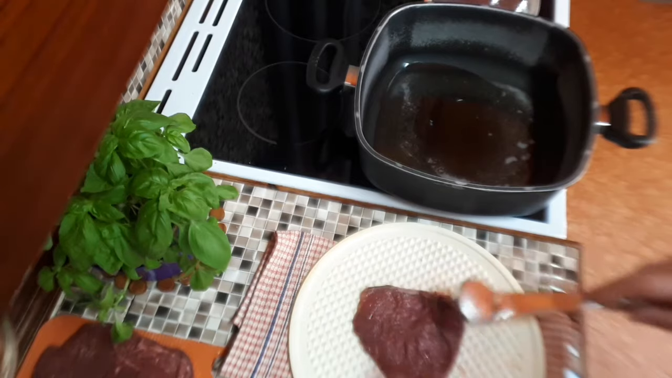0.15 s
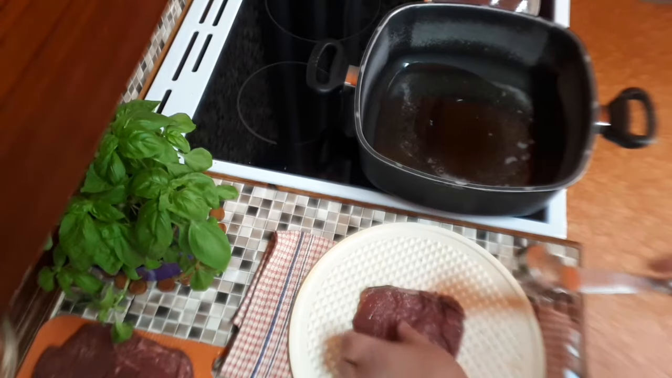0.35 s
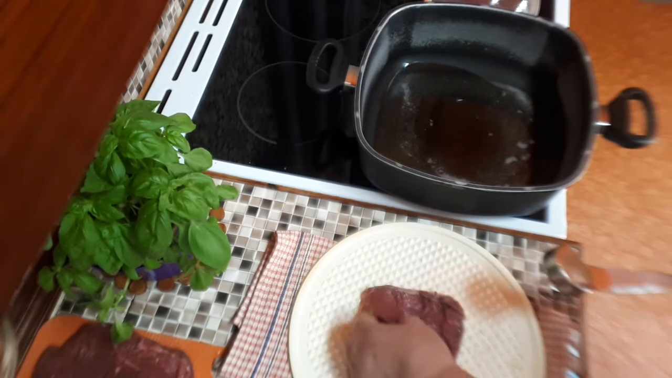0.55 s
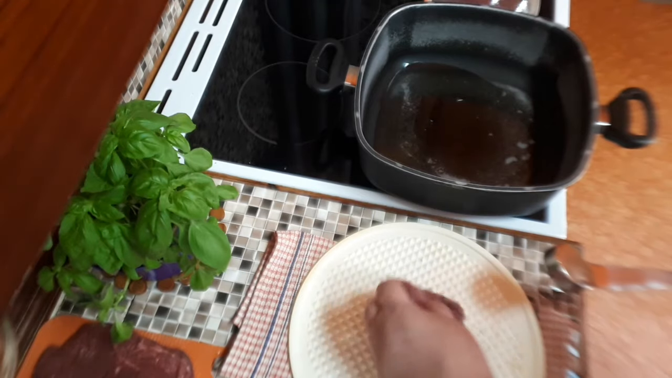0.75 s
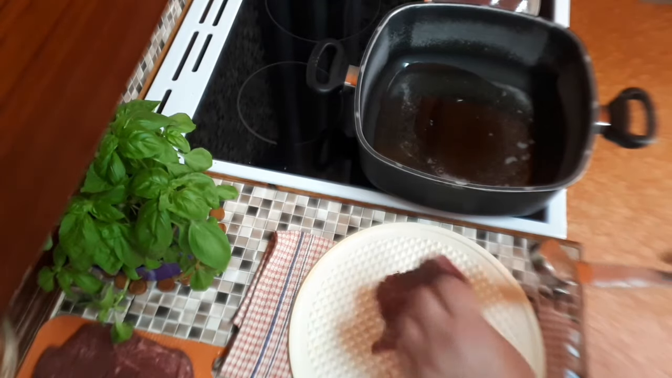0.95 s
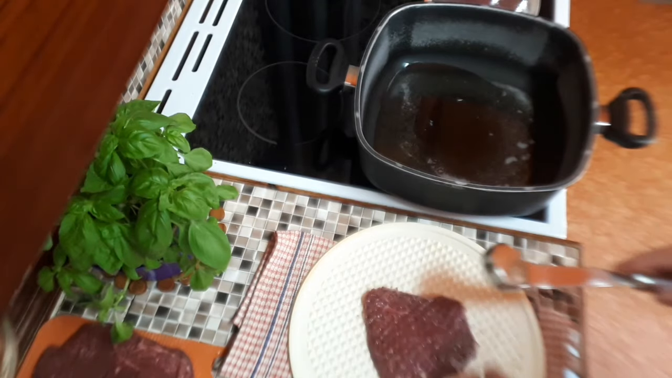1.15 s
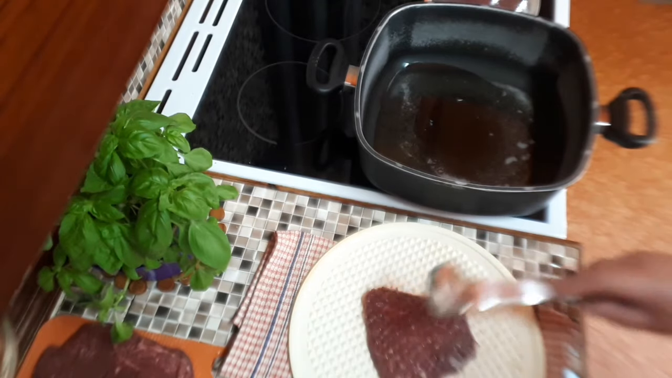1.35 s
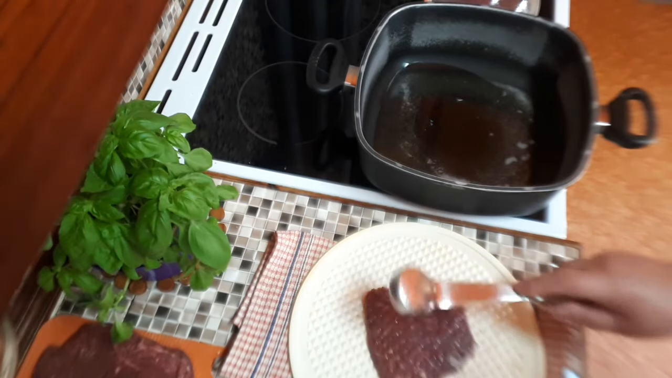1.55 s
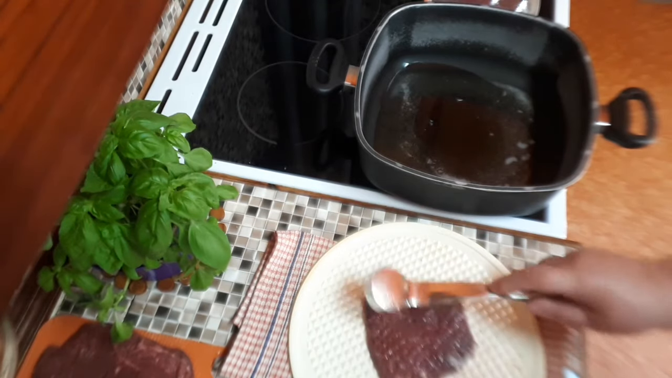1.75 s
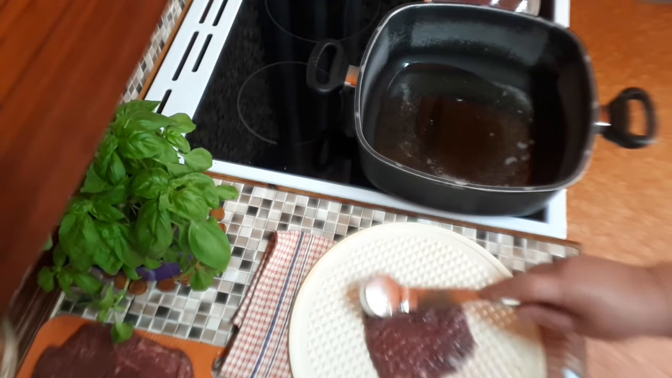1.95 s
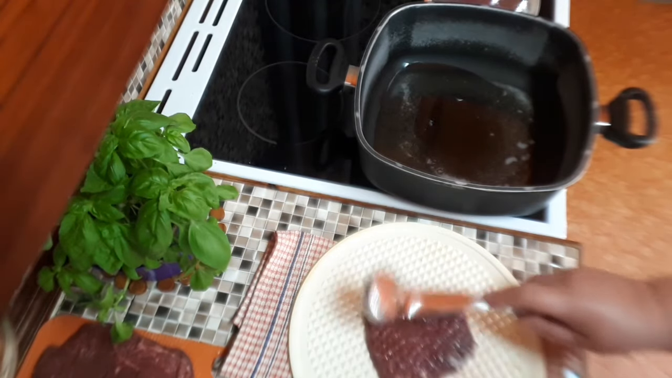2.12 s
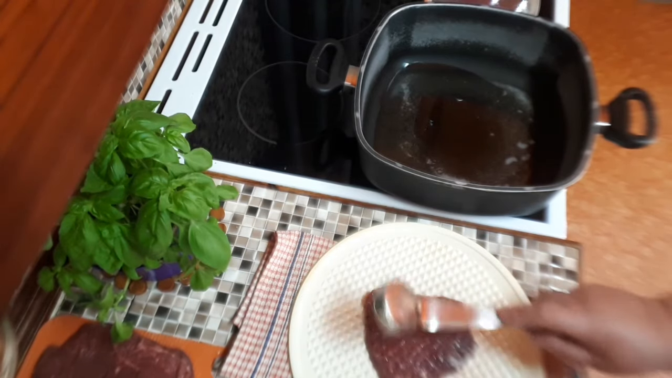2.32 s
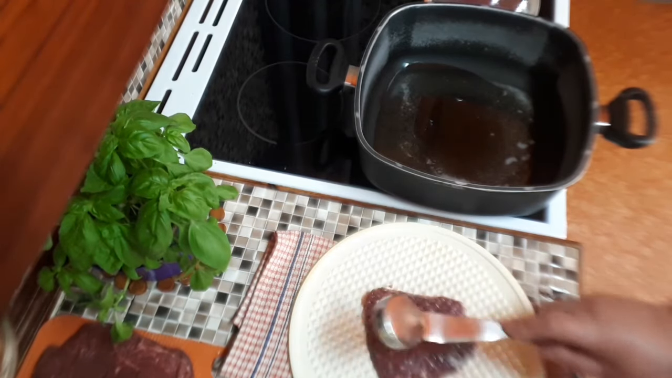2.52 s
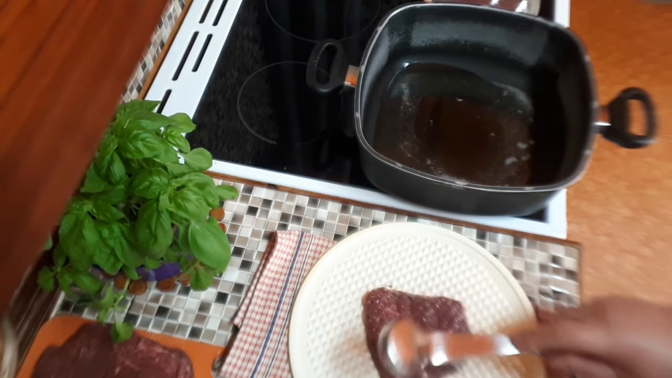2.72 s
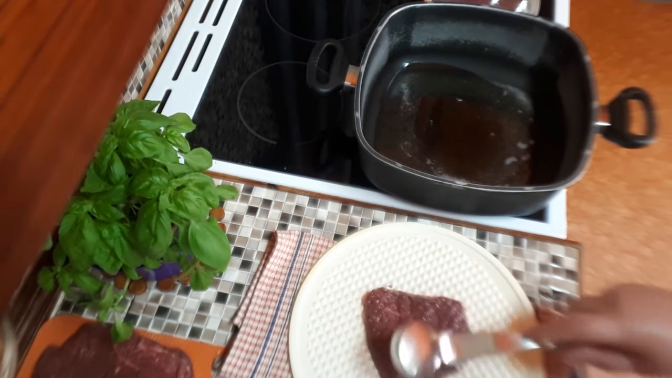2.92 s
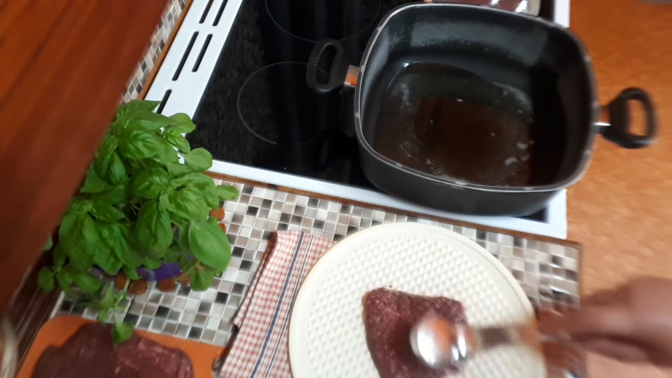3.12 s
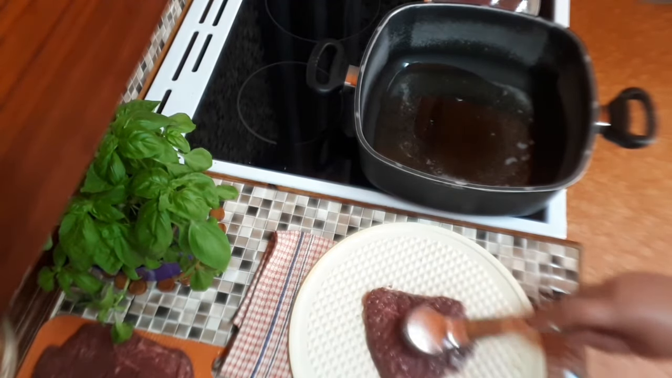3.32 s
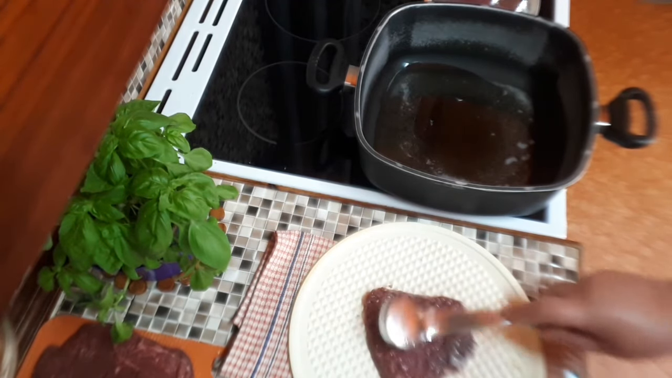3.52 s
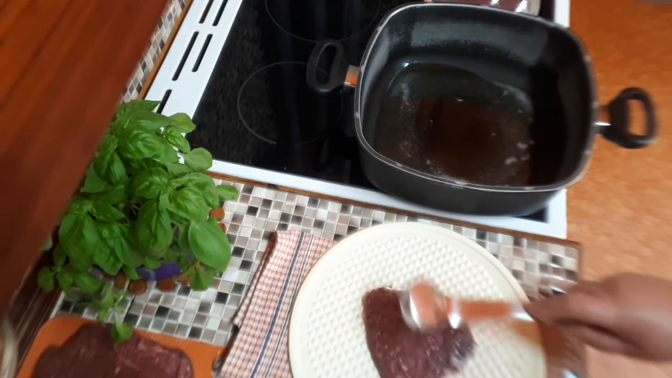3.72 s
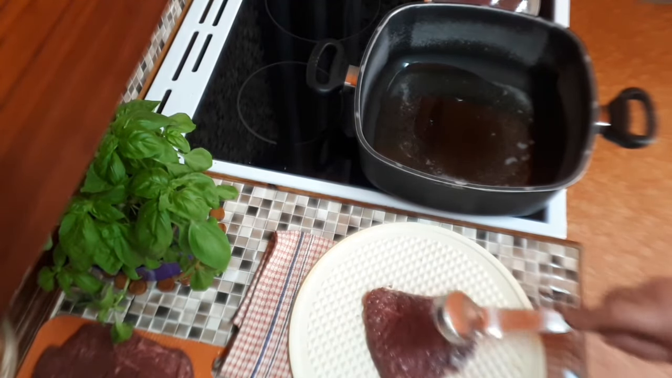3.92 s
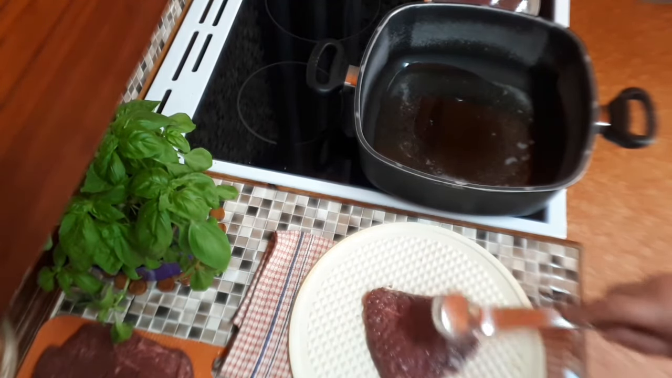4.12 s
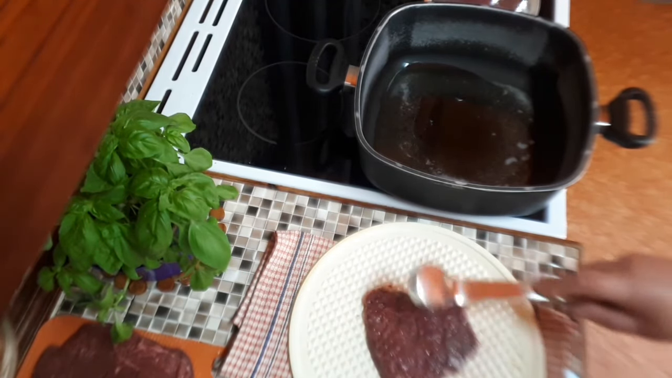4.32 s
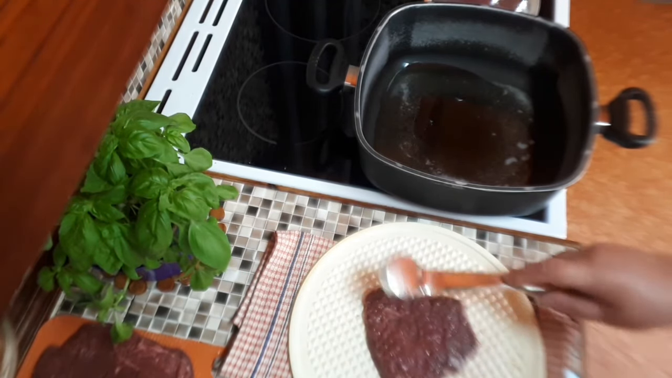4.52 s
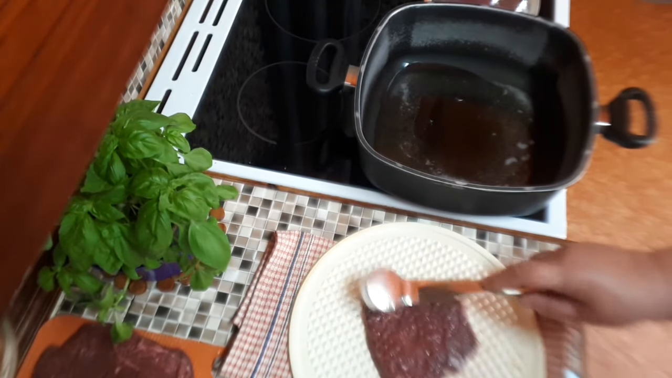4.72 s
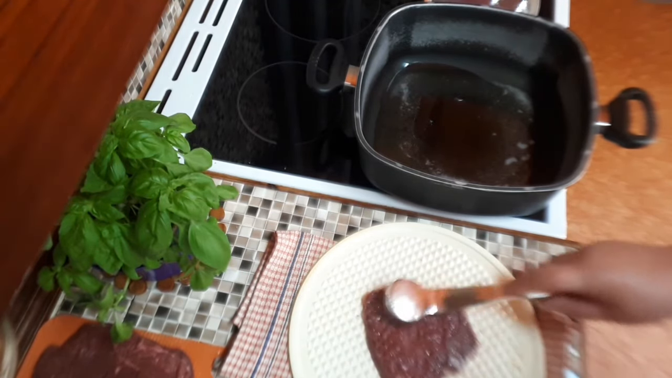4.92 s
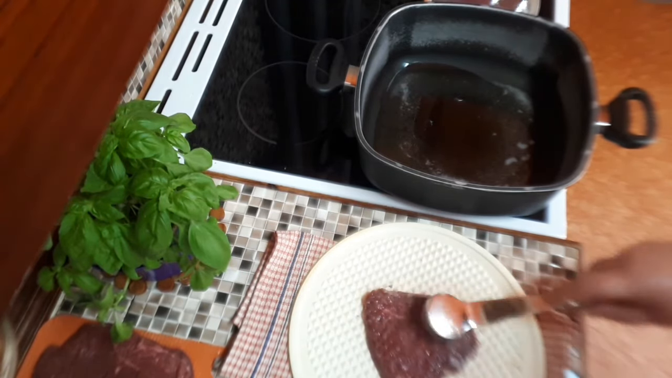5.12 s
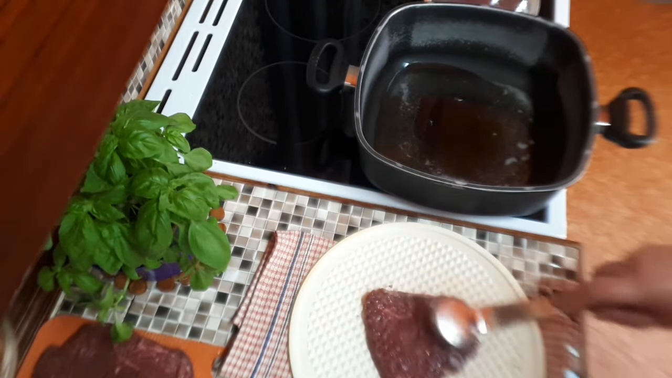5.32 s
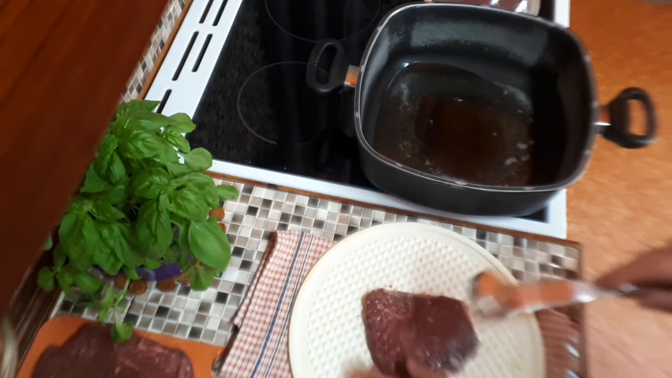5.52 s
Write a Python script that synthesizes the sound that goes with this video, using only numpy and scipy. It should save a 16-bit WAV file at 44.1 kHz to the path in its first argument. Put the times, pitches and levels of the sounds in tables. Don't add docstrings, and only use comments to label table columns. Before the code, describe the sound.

A small hard-surfaced kitchen, heard closely in stereo over quiet air and soft microphone hiss. The fading tail of an earlier blow is barely present when, at 0.05 s, a steel spoon clacks hard against a plastic board with a thump. From about 0.45 to 1.05 s fingers slide and turn a raw meat slice: very faint sticky catches and rubbing. At 1.08 s the slice drops with a soft wet flop. From 1.44 s to 5.35 s the spoon pounds it evenly, about every 0.23 s. Each blow is a low counter thud with a dull fleshy squash and a light wet slap, followed some 30 to 40 ms later by a crisp sticky tick as steel peels away, sometimes doubled. Weights and tones vary slightly. At 4.01 s one blow strikes the board, louder, harder and knockier. Low resonances and a short bright room tail trail each hit; the last fades by the end, about 5.7 s.

```python
import sys
import numpy as np
from scipy import signal
from scipy.fft import rfft, irfft, next_fast_len
from scipy.io import wavfile
from scipy.ndimage import map_coordinates

SR = 44100
rng = np.random.default_rng(int(sys.argv[2]) if len(sys.argv) > 2 else 0)


def amplitude_ratio(level_db):
    exponent = np.asarray(level_db, float) / 20
    return 10 ** exponent


def dump_mix(stems):
    frames = np.atleast_2d(stems).T
    limited = np.clip(frames, -1, 1)
    pcm = np.round(limited * 32767).astype(np.int16)
    wavfile.write(sys.argv[1], SR, pcm)


N = 245371
LEAD = SR // 2
SPAN = int(.47 * SR)

# frequency in Hz, level in dB per Hz.
HUSH_SPECTRUM = [(15, -36), (25, -5.5), (145, 1), (677, -18.5), (1020, -4.5), (1440, -16), (2610, -18),
                 (4140, -28.5), (5730, -19.5), (6210, -25.5), (6740, -24), (14000, -19), (16000, -22)]
# frequency in Hz, t60 in seconds.
KITCHEN_T60 = [(200, 0.35), (600, 0.49), (2000, 0.5), (5000, 0.41), (9000, 0.38), (15000, 0.28)]
# frequency in Hz, likeness from 0 to 1.
PORT_LIKENESS = [(150, 0.8), (300, 0.8), (600, 0.8), (1300, 0), (4000, 0)]
# frequency in Hz, level in dB.
WALL_COLOUR = [(150, -0.5), (350, -5), (700, 0), (4000, -0.5), (12000, -2)]
# frequency in Hz, level in dB.
PORT_COLOUR = [(20, -1), (45, 0.5), (70, 4), (2500, 5.5), (3600, 11.5), (5500, -1.5), (7600, 2),
               (9000, -11.5), (11600, -2), (13500, -7), (15800, -4.5), (16050, -15.5), (16700, -32)]
# frequency in Hz, left minus right in dB.
PORT_BALANCE = [(60, -1.5), (150, -1.5), (380, -2), (950, 2.6), (2600, -0.5), (4000, -7), (15000, -3.5)]
# time in seconds, level in dB.
FINGER_PRESSURE = [(0.5, -99), (0.606, -60), (0.7, -76), (0.8, -79.5), (0.93, -82.5), (0.98, -80),
                   (1.065, -60.5)]
# start in seconds, peak in dB.
CATCHES = [(0.457, -92.5), (0.551, -59), (0.595, -60.5), (0.707, -61), (0.799, -64), (0.814, -63),
           (0.936, -64), (0.997, -66.5), (1.041, -58), (1.357, -70)]
# frequency in Hz, width in Hz, level in dB.
SLIDE_RESONANCES = [(176.5, 32, -2), (1070, 100, -8), (1280, 89, -2.5), (2200, 150, -8.5),
                    (3400, 79, -12.5), (4640, 430, -18.5), (6550, 1300, -22.5)]
# start in seconds, peak in dB, spoon ring in dB.
PEELS = [(0.067, -46, -11), (1.4812, -25, -10), (1.7206, -27, -12.5), (1.73, -36, 5.5), (1.7492, -42, -7),
         (1.9618, -23.5, -15), (2.2092, -25, -24), (2.4722, -33.5, -1), (2.4945, -34.5, -6),
         (2.673, -31, -14), (2.725, -34, -6), (2.7454, -39.5, 2.5), (2.898, -24.5, -3.5),
         (2.9456, -36, -16), (3.1284, -25, -5), (3.3497, -24, -7), (3.587, -27.5, -4), (3.8153, -23, -6),
         (4.045, -24, -23), (4.484, -21.5, -10), (4.4922, -27.5, -5), (4.708, -21.5, -13),
         (4.7172, -27.5, -19), (4.913, -33, -12), (4.9344, -21.5, -9), (4.945, -27, -20), (5.135, -34, -7),
         (5.156, -22, -6.5), (5.3637, -30, -2), (5.3847, -27, -29)]
# frequency in Hz, level in dB.
TICK_SPECTRUM = [(3500, -16), (6000, -7.5), (8000, 5.5), (12000, 7), (17000, 0)]
# frequency in Hz, level in dB.
SPOON_RING = [(1500, -41), (3000, -12), (3600, -1), (4200, -26), (6000, -24), (9000, -51)]
# start in seconds, peak, low part, bright part and room, all in dB.
KNOCKS = [
    (0.047, -8, 1.5, -2.5, -3.5),
    (1.0774, -22.5, -3.5, -1.5, -2),
    (4.014, -4.5, 11, 1, -2.5),
]
# frequency in Hz, width in Hz, level in dB.
BOARD_RESONANCES = [(257, 75, 0), (363, 50, 4.5), (750, 520, -5), (546, 150, -3.5), (962, 61, -8.5),
                    (1296, 550, -3.5), (1664, 180, -3), (2070, 223, -6), (2770, 940, -17)]
# start in seconds, peak in dB, pitch of the squeezed air pocket in Hz,
# its strength in dB.
SLAPS = [(0.0475, -30.5, 3940, 6.5), (1.0777, -26, 2520, 2.5), (1.4413, -32, 3560, -4),
         (1.6987, -30.5, 7200, 14), (1.927, -29.5, 3260, 1.5), (2.172, -26, 3220, 0.5),
         (2.4008, -29.5, 7500, -1), (2.6334, -34, 7700, 6), (2.8579, -28, 2820, -3),
         (3.0949, -32.5, 6370, -11), (3.3158, -29.5, 6500, 1), (3.5564, -35.5, 7700, 8),
         (3.7813, -28.5, 7600, -9), (4.0104, -25.5, 2580, 4), (4.2337, -32, 7700, -7),
         (4.451, -41, 3440, -6), (4.6754, -31.5, 2660, 0), (4.9025, -36.5, 7400, -1),
         (5.122, -32.5, 6940, 8), (5.3547, -32, 7700, -22)]
# frequency in Hz, level in dB.
SLAP_SPECTRUM = [(1200, -34), (3000, -26.5), (5000, 0.5), (8000, 1.5), (12000, 5.5), (17000, -2.5)]
# start in seconds, upper thump peak in dB, deep thump in dB, flesh in dB,
# pitch at which the squashed spot answers in Hz.
BLOWS = [(0.049, -17.5, -29.5, -22.5, 1000), (1.078, -41.5, -42.5, -27.5, 1000),
         (1.4405, -22.5, -22, -44, 1000), (1.6978, -19.5, -22.5, -35, 700), (1.928, -17, -20, -33.5, 975),
         (2.1729, -16.5, -18.5, -31, 1080), (2.4023, -16.5, -18.5, -30.5, 2150),
         (2.6343, -15.5, -17.5, -31.5, 1600), (2.858, -15, -18, -29, 1040),
         (3.0965, -21, -21.5, -35.5, 1500), (3.316, -18.5, -20, -35, 2200), (3.5567, -23, -21, -42, 2300),
         (3.7825, -14.5, -20.5, -30.5, 1600), (4.013, -13, -23, -22, 1000), (4.2348, -20.5, -25, -43, 650),
         (4.4505, -15, -20.5, -36, 565), (4.675, -15.5, -18.5, -32.5, 620),
         (4.9026, -17, -19.5, -36.5, 900), (5.1232, -13, -20.5, -33, 620), (5.354, -16.5, -22, -42.5, 1400)]
EARLIER_BLOW = (-0.3237, -3.5, -9, -7.5, 998)
# frequency in Hz, left in dB, right in dB, t60 in seconds,
# lead of the right port in radians.
LOW_MODES = [(41, -19, -23, .3, .6), (59.2, -10.5, -14.5, 1, .3), (84.2, -1, 2.5, 0.38, 0.71),
             (108.83, -0.5, -3, 0.43, 0.18), (134.83, -11, -5.5, 0.66, 0.2), (151.8, -6, -9, 0.48, 1.95),
             (182.7, -7.5, -2, 0.14, 1.55), (207.4, -5.5, -6, 0.49, 4.1), (245.7, 3.5, 7, 0.19, 2.39),
             (297.6, -11.5, -8, 0.38, .1), (367.4, -7.5, -6, 0.28, .2), (434.7, -13.5, -16, 0.33, .3),
             (466.4, -19.5, -21, 0.55, 0.3)]
# frequency in Hz, level in dB.
CUPBOARDS = [(40, -20), (90, -2), (150, -5), (250, 2), (380, -5), (520, -17), (900, -38)]
# frequency in Hz, level in dB.
DULL_FLESH = [(200, -3.5), (450, 6), (700, 2.5), (1000, 0.5), (1500, -9), (3000, -62)]
# frequency in Hz, level in dB.
BRIGHT_FLESH = [(500, -23), (1100, -2.5), (1600, 0.5), (2200, 3), (3500, -13), (6000, -14), (12000, -45)]


def along(points, hz):
    f, value = np.transpose(points)
    return np.interp(np.log(hz + 1), np.log(f + 1), value)


def shaped(points):
    return lambda hz: amplitude_ratio(along(points, hz))


def unit(x):
    return x / np.sqrt(np.mean(x ** 2) + 1e-20)


def filtered(x, response):
    m = next_fast_len(x.shape[-1] + 4096)
    spectrum = rfft(x, m) * response(np.fft.rfftfreq(m, 1 / SR))
    return irfft(spectrum, m)[..., :x.shape[-1]]


def resonant(peaks):
    def response(f):
        total = 0
        for k, (centre, width, db) in enumerate(peaks):
            damping = 1j * f * width
            total = total + (-1) ** k * amplitude_ratio(db) * damping / (centre * centre - f * f + damping)
        return total
    return response


def silence():
    return np.zeros((2, LEAD + N + SPAN))


def add(track, s, sound):
    track[:, LEAD + round(s * SR):][:, :sound.shape[1]] += sound


def room_tail(colour, size):
    hz = np.fft.rfftfreq(256, 1 / SR)
    frame_s = np.arange(size // 128 + 2) * 128 / SR
    z = rng.standard_normal((2, len(hz), len(frame_s), 2)) @ [1, 1j]
    turn = np.arccos(np.clip(along(PORT_LIKENESS, hz), 0, 1))[:, None] / 2
    z = np.cos(turn) * z[0] + np.array([1, -1])[:, None, None] * np.sin(turn) * z[1]
    z = z * amplitude_ratio(-60 * frame_s / along(KITCHEN_T60, hz)[:, None])
    tail = signal.istft(z, SR, nperseg=256)[1][:, :size]
    reflected = lambda f: colour(f) * shaped(WALL_COLOUR)(f)
    tail = filtered(tail, reflected)
    given_back = np.linalg.norm(reflected(hz)) / np.linalg.norm(colour(hz))
    onset = 1 - np.exp(-np.arange(size) / SR / 0.00073)
    return given_back * tail / np.sqrt(np.sum(tail ** 2) / 2) * onset


def strike(colour, rise, t60, wet_db, patchy_db=2.5, grain_db=4, size=SPAN):
    t = np.arange(4096) / SR
    knots = rng.standard_normal(64)
    patches = lambda f: np.interp(np.log(f + 1), np.linspace(5, 10, len(knots)), knots)
    own = lambda f: colour(f) * amplitude_ratio(patchy_db * patches(f))
    grain = amplitude_ratio(grain_db * np.repeat(np.r_[.7, rng.standard_normal(127)], 32))
    puff = filtered(rng.standard_normal(len(t)) * grain, own)
    puff = unit(puff) * (1 - np.exp(-t / rise)) * amplitude_ratio(-60 * t / t60)
    out = amplitude_ratio(wet_db) * room_tail(own, size) * np.sqrt(2 * rise * SR + t60 * SR / np.log(1e6))
    lag = 5
    out[0, lag:lag + len(t)] += puff
    out[1, :len(t)] += puff
    return out


def flex(db, hz, t60):
    t = np.arange(SPAN) / SR
    return -amplitude_ratio(db - 60 * t / t60) * np.sin(2 * np.pi * hz * t) * (1 - np.exp(-t / 0.0024))


def hush():
    a, b = filtered(rng.standard_normal((2, N)), shaped(HUSH_SPECTRUM))
    return amplitude_ratio(-69.5) * unit(np.array([a + 0.61 * b, a - 0.88 * b]))


def hand():
    out = silence()
    colour = resonant(SLIDE_RESONANCES)
    for s, db in CATCHES:
        add(out, s, amplitude_ratio(db - 5.5) * strike(colour, rise=0.0018, t60=0.14, wet_db=-2.5, size=SPAN // 2))
    s, db = np.transpose(FINGER_PRESSURE)
    level_db = np.interp(np.arange(N) / SR, s, db, left=-120, right=-120)
    uneven = map_coordinates(rng.standard_normal(N // 300 + 4), [np.arange(N) / 300])
    rub = rng.standard_normal((2, N)) * amplitude_ratio(3 * uneven)
    out[:, LEAD:LEAD + N] += amplitude_ratio(level_db - 8.5) * unit(filtered(rub, colour))
    return out


def peels():
    out = silence()
    for s, db, ring_db in PEELS:
        colour = lambda hz: shaped(TICK_SPECTRUM)(hz) + amplitude_ratio(ring_db + 10) * shaped(SPOON_RING)(hz)
        tick = strike(colour, rise=0.00016, t60=0.019, wet_db=-2.5, grain_db=5, size=SPAN // 2)
        bump = flex(-39.5, hz=325.0, t60=0.064)[:SPAN // 2]
        add(out, s - .0005, amplitude_ratio(db - 4.5) * tick + bump)
    return out


def knocks():
    out = silence()
    for s, db, low_db, bright_db, room_db in KNOCKS:
        tilt = shaped([(450, low_db), (650, 0.009), (1300, 0.012), (1800, bright_db - 1)])
        colour = lambda hz: resonant(BOARD_RESONANCES)(hz) * tilt(hz)
        knock = strike(colour, rise=0.00046, t60=0.028, wet_db=room_db - 0.5, patchy_db=3.2, grain_db=0.0)
        add(out, s, amplitude_ratio(db - 2.0) * knock)
    return out


def slaps():
    out = silence()
    top = shaped([(8500, 0.0015), (10000, -1.5)])
    for s, db, pocket_hz, pocket_db in [(EARLIER_BLOW[0], -30, 4000, 0)] + list(SLAPS):
        pocket = resonant([(pocket_hz, 600, pocket_db)])
        colour = lambda hz: shaped(SLAP_SPECTRUM)(hz) * top(hz) + np.abs(pocket(hz))
        add(out, s - .001, amplitude_ratio(db - 3.0) * strike(colour, rise=0.00042, t60=0.065, wet_db=0))
    return out


def thump(deep_db, upper_db):
    hz, left_db, right_db, t60, lead = np.transpose(LOW_MODES)[:, :, None]
    t = np.arange(SPAN) / SR
    chance = rng.standard_normal((3, len(hz), 1))
    deep = hz < 165
    level_db = np.where(deep, deep_db, upper_db) - 5.5 + np.where(deep, 1.5, 2.5) * chance[0]
    pitch = hz * (1 + np.where(deep, .006, .012) * chance[2])
    sign = (-1) ** np.arange(len(hz))[:, None] * np.where(deep, 1, -1)
    size = sign * amplitude_ratio(level_db - 60 * t / t60) * (1 - np.exp(-t / 0.0032))
    deep_lead_s = 0.0021
    turn = 2 * np.pi * pitch * (t + deep * deep_lead_s) + 0.64 * chance[1]
    apart = lead * (1 - np.exp(-t / 0.0045)) / 2
    left = np.sum(size * amplitude_ratio(left_db) * np.sin(turn - apart), axis=0)
    right = np.sum(size * amplitude_ratio(right_db) * np.sin(turn + apart), axis=0)
    crowd = amplitude_ratio(upper_db - 9.5) * strike(shaped(CUPBOARDS), rise=0.01, t60=0.14, wet_db=2.0)
    board = flex(upper_db + 1.5, hz=294.6, t60=0.035) - flex(deep_db - 3.5, hz=101.5, t60=0.073)
    return np.array([left, right]) + board + crowd


def flesh(bright_db, spot_hz):
    answer = resonant([(spot_hz, 0.32 * spot_hz, 5)])
    spot = lambda hz: 3 + np.abs(answer(hz))
    dull_db = -37 + 0.56 * (bright_db + 36)
    dull = strike(lambda hz: shaped(DULL_FLESH)(hz) * spot(hz), rise=0.0045, t60=0.033, wet_db=4.5)
    bright = strike(lambda hz: shaped(BRIGHT_FLESH)(hz) * spot(hz), rise=0.0011, t60=0.035, wet_db=2.5)
    return amplitude_ratio(dull_db - 5.5) * dull + amplitude_ratio(bright_db - 5.5) * bright


def blows():
    out = silence()
    for s, upper_db, deep_db, bright_db, spot_hz in [EARLIER_BLOW] + list(BLOWS):
        add(out, s, thump(deep_db, upper_db - 5))
        on_board = min(abs(s - knock[0]) for knock in KNOCKS) < .01
        if not on_board:
            add(out, s - .0011, flesh(bright_db, spot_hz))
    return out


def scene():
    hits = hand() + peels() + knocks() + slaps() + blows()
    return hush() + hits[:, LEAD:LEAD + N]


def roll_off(x):
    return signal.sosfilt(signal.butter(12, 16970, fs=SR, output="sos"), x)


def record(dry):
    halves = np.array([[.5], [-.5]])
    balance_db = lambda hz: halves * along(PORT_BALANCE, hz) * (hz > 550)
    ports = lambda hz: amplitude_ratio(along(PORT_COLOUR, hz) + balance_db(hz))
    return roll_off(filtered(dry, ports))


dry = scene()
out = record(dry)
dump_mix(out)
```